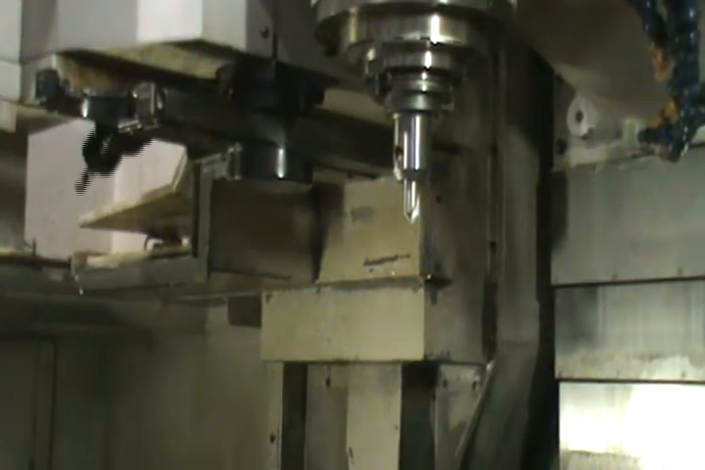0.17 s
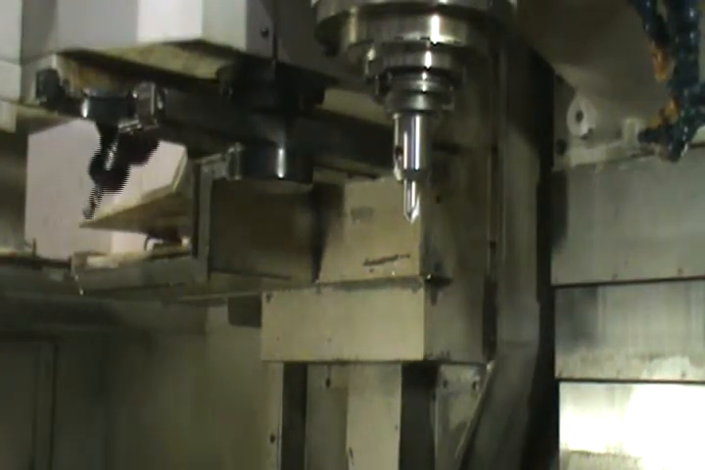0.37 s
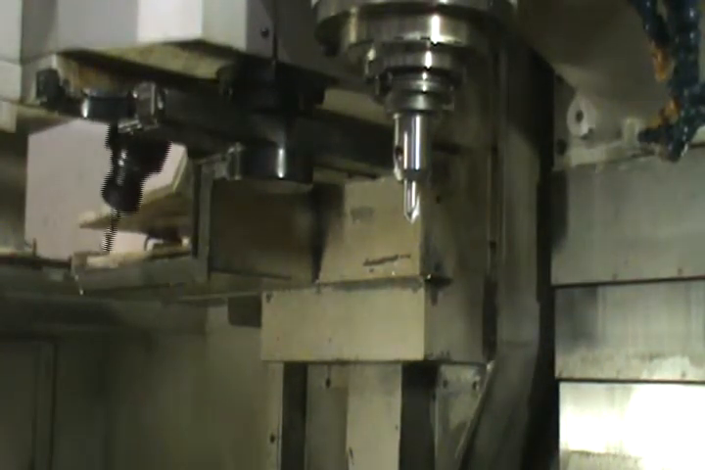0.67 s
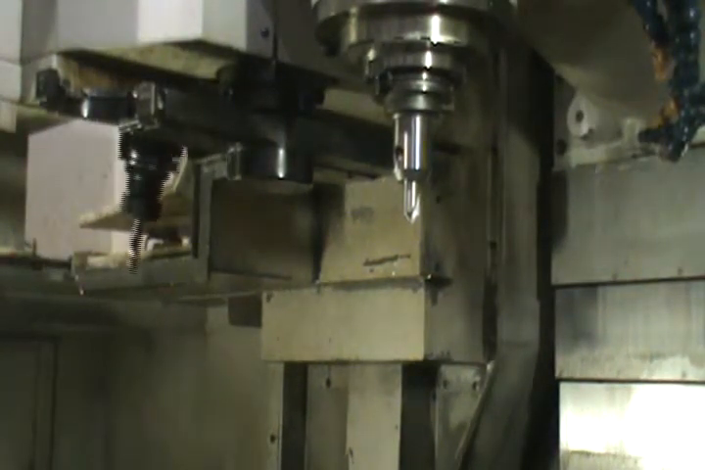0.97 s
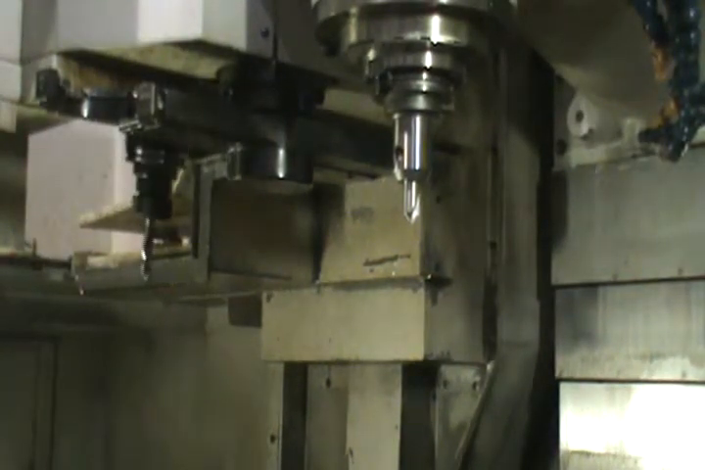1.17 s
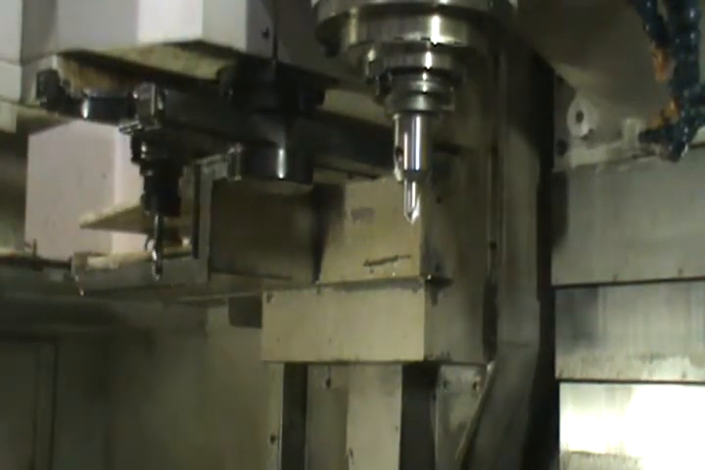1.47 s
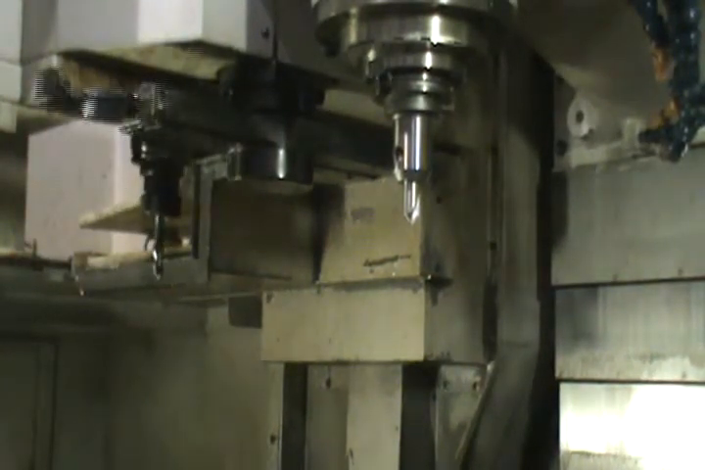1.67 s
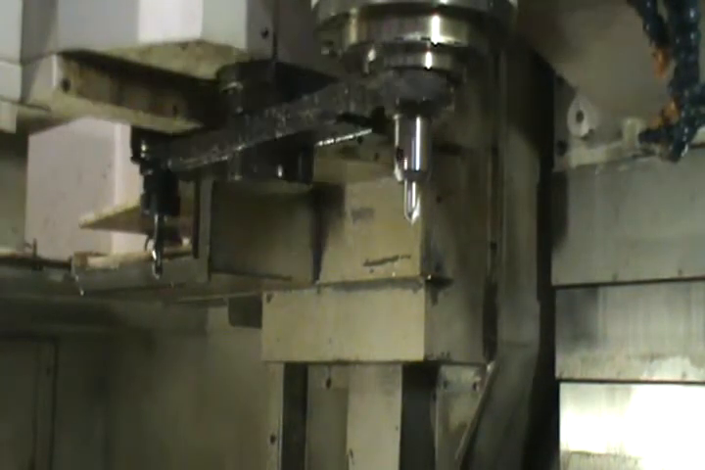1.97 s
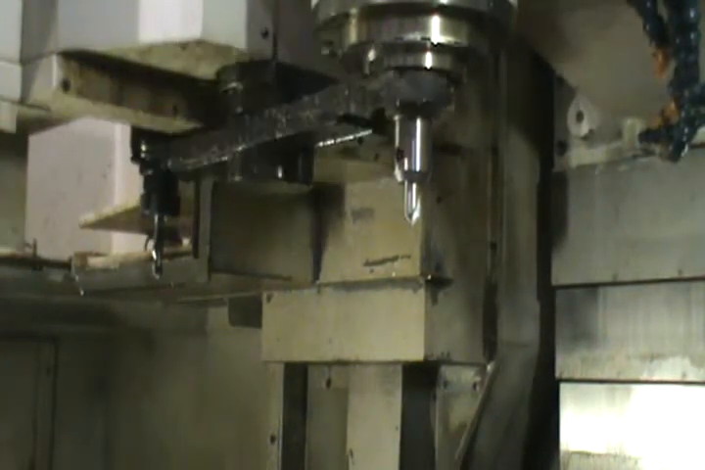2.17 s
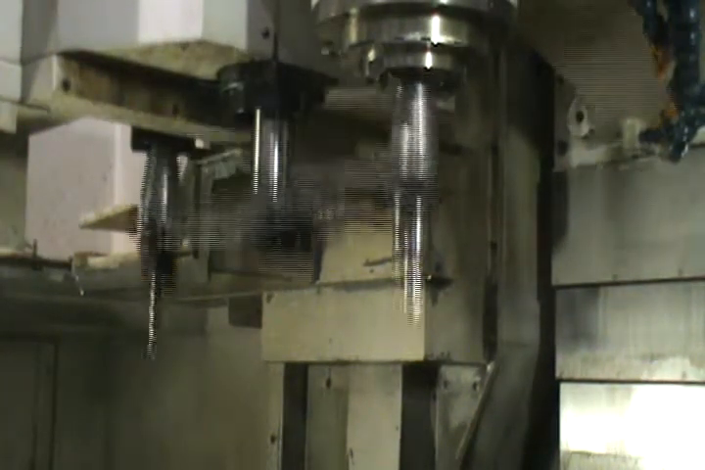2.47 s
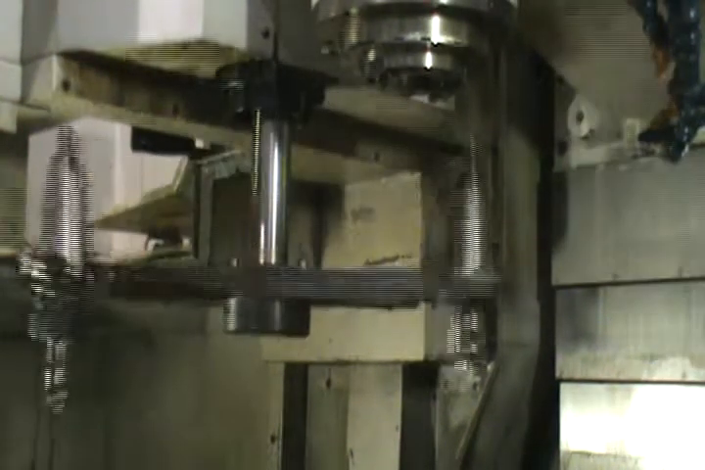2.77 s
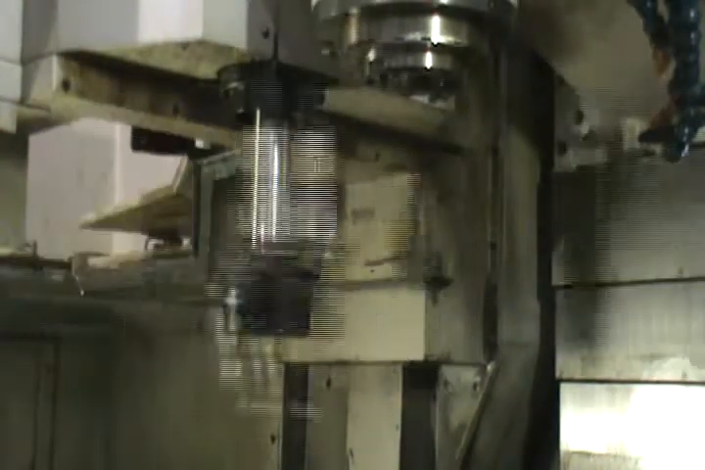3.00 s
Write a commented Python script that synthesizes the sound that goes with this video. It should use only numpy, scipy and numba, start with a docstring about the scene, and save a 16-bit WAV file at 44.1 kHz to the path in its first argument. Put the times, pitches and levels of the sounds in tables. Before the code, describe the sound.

A machine's tool-swapping arm clunks, whirs up, bangs and rattles as compressed air hisses, then whirs on over constant hum and fan noise; small stereo camera microphone nearby in a reverberant workshop.

```python
"""A machining centre changes tools, heard from a small camera beside the open enclosure.
A pump hums (wavering sines) and fans hiss (coloured noise, duct resonances) throughout. First the tool pot
clunks down (ringing castings), then the geared arm whirs round (mesh tone, tooth noise, bearing whir). Air
blasts the taper (noise bursts, whistles) as the drawbar knocks and rattles loose (dense taps, chatter), and
the arm whirs on. The camera turns its gain down under the blast."""
import sys
import numpy as np
from scipy import signal
from scipy.fft import rfft, irfft
from scipy.io import wavfile
from scipy.ndimage import uniform_filter1d
from numba import njit

SR = 44100
rng = np.random.default_rng(int(sys.argv[2]) if len(sys.argv) > 2 else 0)


def digitize_waveform(pressure):
    """Quantize a signal to 16-bit integers and store it at the path in sys.argv[1].

    Rows of a 2-D input are taken as channels; values are limited to [-1, 1].
    """
    field = np.atleast_2d(pressure).T
    bounded = np.clip(field, -1, 1)
    quanta = np.round(bounded * 32767).astype(np.int16)
    wavfile.write(sys.argv[1], SR, quanta)


def amplitude_ratio(level_db):
    """Convert a level in decibels to the matching linear amplitude (field) ratio."""
    exponent = np.asarray(level_db, float) / 20
    return 10 ** exponent


N = 138474
T = np.arange(N) / SR  # seconds

# Path of the arm drive: time_s, mesh_hz, mesh_level_db, noise_level_db (whir and tooth noise)
ARM_DRIVE = [(1.72, 418, -76.5, -36), (1.77, 449.3, -25, -27.5), (1.81, 482.1, -26, -27),
             (1.85, 493.4, -17.5, -27), (1.9, 497.2, -25, -28), (1.96, 491.6, -19, -20),
             (2.0, 493, -19, -20), (2.22, 493, -29, -35.5), (2.28, 493, -58, -26.5), (2.42, 493, -45, -31),
             (2.49, 492, -14, -13), (2.53, 496.7, -14, -16), (2.66, 494, -18.5, -18), (2.8, 493, -20, -23),
             (2.93, 492.6, -20, -18), (3.04, 494.8, -17, -23), (3.09, 493.3, -20, -23.5),
             (3.14, 491, -20.5, -26)]
# Overtones of the gear mesh: multiple, level_db
MESH_HARMONICS = [(1, 1), (2, -13), (3, -15)]
# Moments when the mesh bears harder or slackens: time_s, change_db
MESH_SWELLS = [(1.809, 8.5), (1.852, 6), (1.898, 11), (2.53, 8.5), (2.605, 8.5), (2.658, 12), (2.69, -13),
               (2.71, 3), (2.89, -4), (3.0, -8), (3.05, 5), (3.08, -2), (3.124, 5.5)]
# Gearbox resonances rung by tooth noise, relative levels: centre_hz, width_hz, level_db
GEARBOX_RESONANCES = [(921.4, 46, -0.5), (1429, 72, -7), (1880, 160, -10.5), (2880, 150, -12.5),
                      (4060, 87, -14.5), (4470, 110, -8.5), (4850, 21, -15), (5340, 140, -16),
                      (5870, 27, -14), (6380, 450, -8), (7525, 130, -14)]
# Bearing whir, relative spectrum: frequency_hz, density_db (per Hz)
WHIR_SPECTRUM = [(240, -50), (400, -7.5), (494, -8.5), (697, -13.5), (907, -10), (1300, -23.5),
                 (1520, -14.5), (1730, -21), (4490, -25), (9400, -29.5)]
# Ringing modes of the arm and head castings: pitch_hz, level_db, t60_s
CASTING_MODES = [(62, -6, .4), (150, -4, .24), (194, 0, .2), (325, -5, .1), (511, -2, .14), (590, -6, .08),
                 (660, -5, .1), (765, -6, .09), (895, -7, .13), (1044, -10, .08), (1244, -13, .06),
                 (1630, -11, .08), (1880, -12, .06)]
# Blows on the castings: start_s, peak_db, strongest_hz, spread_octaves
BLOWS = [(1.143, -17, 305, 1), (1.167, -21, 255, 1.6), (1.57, -7, 295, 0.93), (1.586, -12, 510, 0.54),
         (1.597, -6.5, 203, 0.35), (1.612, -18, 296, 0.75), (1.648, -17, 180, 1), (1.677, -13.5, 200, 0.64),
         (2.002, -8, 1650, 0.46), (2.012, -3, 1810, 0.34), (2.034, 5, 570, 1), (2.055, -1, 495, 0.3),
         (2.073, 0.5, 243, 1.1), (2.096, -5, 190, 0.69), (2.111, -5, 680, 0.46), (2.165, -4.5, 196, 0.75),
         (2.217, -5.5, 121, 1.2), (2.307, -28, 63, 0.49), (2.377, -11.5, 870, 0.13),
         (2.39, -16.5, 925, 0.057)]
# Drawbar rattle as it slides: time_s, level_db (of the whole blend, relative), resonance_hz
DRAWBAR_RATTLE = [(1.985, -40, 1700), (2.008, -15, 1650), (2.03, -14, 900), (2.05, -16, 560),
                  (2.09, -17, 620), (2.115, -12, 760), (2.16, -13, 690), (2.215, -13, 640),
                  (2.245, -23, 600), (2.33, -29, 860), (2.4, -26, 900), (2.43, -50, 900)]
# Compressed-air bursts: start_s, rise_s, t60_s (after the rise), level_db, centre_hz, spread_octaves
AIR_BURSTS = [(1.978, 0.00084, 0.28, -10.5, 4370, 1.65), (2.022, .003, .05, -16.5, 4440, 0.74),
              (2.149, 0.045, .4, -19, 6000, 0.63), (2.403, 0.04, 0.85, -6.5, 6000, 4.2),
              (2.884, .003, .09, -12.5, 8300, 0.82)]
# Air jet, relative spectrum ahead of each burst's own band: frequency_hz, density_db (per Hz)
JET_SPECTRUM = [(530, 6.5), (900, -3.5), (1130, 6), (1360, 3), (1640, 4.5), (3490, -7.5), (4370, -6),
                (4590, -4.5), (4970, -2), (9400, -12)]
# Nozzle whistles: start_s, fade_s, pitch_hz, level_db (before flutter)
NOZZLE_WHISTLES = [(2.123, .015, 4150, -20), (2.165, .09, 4110, -25), (2.438, .11, 4680, -12)]
# Fan and shop noise, relative spectrum: frequency_hz, density_db (per Hz)
SHOP_SPECTRUM = [(15, -53), (25, -6.5), (216, -5.5), (264, -5.5), (314, -6.5), (423, -12.5), (467, -16),
                 (529, -14), (1170, -19.5), (2340, -21), (3230, -26.5), (6170, -24), (9400, -32)]
# Resonances of the enclosure: centre_hz, width_hz, level_db
DUCT_RESONANCES = [(247.6, 26, -38), (313.6, 13, -38.5), (2452, 160, -43), (3890, 160, -49.5),
                   (6270, 170, -46), (7190, 120, -47)]
# Pump pulsation: multiple (of the pump rate), level_db
PUMP_HARMONICS = [(2, -34.5), (3, -29.5), (4, -41), (6, -43), (8, -44), (9, -47.5), (10, -46.5), (12, -51)]
# Other steady tones of motors and fans: pitch_hz, level_db
MOTOR_TONES = [(60, -42), (120, -40), (148, -43), (416, -33)]
# Likeness of the two microphone ports: frequency_hz, likeness (0 to 1)
PORT_LIKENESS = [(60, 1), (130, 1), (280, 0.71), (600, 0.85), (1280, 0.81), (2760, 0.95), (5930, 1),
                 (12800, 1)]
# Phase by which the left port leads the right: frequency_hz, lead_rad
LEFT_LEAD = [(0, -0.5), (260, 0.92), (520, 0.5), (950, 1), (1460, 0.65), (3190, 0.09), (10300, 0.0),
             (11300, 2)]
# Level of the left port over the right: frequency_hz, difference_db
LEFT_OVER_RIGHT = [(60, 0.5), (110, 1), (200, -2.5), (360, -3), (650, -3.5), (1180, -1), (2140, -1.0),
                   (3880, -0.5), (7030, -0.5), (12800, -2)]


def level(x, db):
    """Scale a sound to an rms level."""
    return x * amplitude_ratio(db) / np.sqrt(np.mean(x ** 2))


def on_hz(table, hz):
    """Read a spectrum table along a log-frequency axis."""
    points = np.array(table, float)
    return np.interp(np.log(hz + 1), np.log(points[:, 0] + 1), points[:, 1])


def curve(table, axis):
    """Draw one column of a time table as a sample-by-sample line."""
    points = np.array(table, float)
    return np.interp(T, points[:, 0], points[:, axis])


def coloured(table):
    """Shape white noise to a spectrum, held flat above 9300 Hz; rms 1."""
    hz = np.minimum(np.fft.rfftfreq(N, 1 / SR), 9300)
    white = rfft(rng.standard_normal(N))
    return level(irfft(white * amplitude_ratio(on_hz(table, hz)), N), 0)


def walk(rate):
    """Smooth random drift of rms 1: noise averaged twice over 1 / rate seconds."""
    k = int(SR / rate)
    once = uniform_filter1d(rng.standard_normal(N), k)
    return level(uniform_filter1d(once, k), 0)


@njit
def svf(x, hz, width):
    """State-variable band-pass whose centre may move, gain 1 at the centre."""
    y, band, low = np.empty(len(x)), 0., 0.
    for i in range(len(x)):
        g, k = np.tan(np.pi * hz[i] / SR), width / hz[i]
        v = (band + g * (x[i] - low)) / (1 + g * (g + k))
        band, low, y[i] = 2 * v - band, low + 2 * g * v, k * v
    return y


@njit
def follow(x, up, down):
    """Envelope follower with separate rise and fall."""
    y, e = np.empty(len(x)), 0.
    for i in range(len(x)):
        e += (x[i] - e) * (up if x[i] > e else down)
        y[i] = e
    return y


def ringing(table, waver_db):
    """Noise ringing in fixed resonances, each swelling on its own."""
    out = 0
    for hz, width, db in table:
        band = svf(rng.standard_normal(N), np.full(N, 1. * hz), 1. * width)
        out = out + amplitude_ratio(waver_db * walk(23.5)) * level(band, db)
    return out


def arm():
    """Gear teeth meet at a gliding pitch that swells under load, over gearbox ringing and bearing whir."""
    swell_s = 0.011
    mesh_hz = curve(ARM_DRIVE, axis=1) * (1 + .0012 * walk(26))
    phase = 2 * np.pi * np.cumsum(mesh_hz) / SR
    swell_db = sum(db * np.exp(-((T - at) / swell_s) ** 2) for at, db in MESH_SWELLS)
    mesh = 0
    for k, db in MESH_HARMONICS:
        mesh = mesh + amplitude_ratio(db + 1.3 * walk(30)) * np.sin(k * phase)
    mesh = mesh * amplitude_ratio(swell_db)
    teeth = level(ringing(GEARBOX_RESONANCES, 2.5), 0)
    whir = amplitude_ratio(1.5 + 2.05 * walk(40)) * coloured(WHIR_SPECTRUM)
    blend = amplitude_ratio(curve(ARM_DRIVE, axis=2)) * mesh + amplitude_ratio(curve(ARM_DRIVE, axis=3)) * (teeth + whir)
    return (T > ARM_DRIVE[0][0]) * blend


def knocks():
    """Each blow rings the casting modes, most strongly near its own pitch, under a short noisy crack."""
    crack_db, crack_s, push_s = -14, 0.019, .001  # crack decay and softened onset, as time constants
    out, t = np.zeros(N + SR), T[:SR // 2]
    hz, db, t60 = np.array(CASTING_MODES).T[:, :, None]
    chance = rng.standard_normal((len(BLOWS), len(CASTING_MODES), 2))
    for (at, peak_db, mid_hz, spread), c in zip(BLOWS, chance):
        # every blow meets the modes with slightly different strengths and pitches
        gain = amplitude_ratio(db + 1.3 * c[:, :1]) * np.exp(-(np.log2(hz / mid_hz) / spread) ** 2)
        modes = np.sin(2 * np.pi * hz * (1 + 0.011 * c[:, 1:]) * t) * np.exp(-np.log(1000) * t / t60)
        ring = np.sum(gain * modes, axis=0)
        crack = svf(rng.standard_normal(len(t)), np.full(len(t), 1.746 * mid_hz), 0.5 * mid_hz * spread)
        blow = ring / np.abs(ring).max() + level(crack, crack_db) * np.exp(-t / crack_s)
        blow *= 1 - np.exp(-t / push_s)
        i = int(at * SR)
        out[i:i + len(t)] += blow * amplitude_ratio(peak_db) / np.abs(blow).max()
    return out[:N]


def rattle():
    """Dense uneven taps and a rough chatter in a sliding resonance while the tool comes free."""
    taps_per_s = 9000
    taps = (rng.random(N) < taps_per_s / SR) * rng.standard_normal(N)
    hz = curve(DRAWBAR_RATTLE, axis=2)
    core = level(svf(svf(taps, hz, 320.), hz, 450.), 0)
    skirt = level(svf(taps, hz, 900.), -5)
    bright = level(svf(taps, 2.4 * hz, 400.), -14)
    rough_phase = 2 * np.pi * np.cumsum(hz * (1 + .04 * walk(70))) / SR
    chatter = level(np.sin(rough_phase) * amplitude_ratio(3. * walk(60)), -6)
    during = (T > DRAWBAR_RATTLE[0][0]) * (T < DRAWBAR_RATTLE[-1][0])
    return (core + skirt + bright + chatter) * amplitude_ratio(curve(DRAWBAR_RATTLE, axis=1)) * during


def air():
    """Compressed air escapes as decaying bands of turbulent noise; the nozzles add fluttering whistles."""
    flutter_hz, flutter_depth = 40, 1
    out, hz = 0, np.fft.rfftfreq(N, 1 / SR) + 1
    jet = rfft(coloured(JET_SPECTRUM) * amplitude_ratio(0.51 * walk(90)))
    for at, rise, t60, db, mid_hz, spread in AIR_BURSTS:
        env = np.clip((T - at) / rise, 0, 1) * amplitude_ratio(-60 * np.maximum(T - at - rise, 0) / t60)
        band = np.exp(-(np.log2(hz / mid_hz) / spread) ** 2)
        out = out + env * level(irfft(jet * band, N), db)
    for at, fade, tone_hz, db in NOZZLE_WHISTLES:
        shape = np.clip((T - at) / 0.0021, 0, 1) * np.exp(-np.maximum(T - at, 0) ** 2 / fade ** 2)
        flutter = 1 + flutter_depth * np.sin(2 * np.pi * flutter_hz * (T - at) + .5 * walk(22))
        phase = 2 * np.pi * np.cumsum(tone_hz * (1 + .0035 * walk(150))) / SR
        out = out + amplitude_ratio(db + 2.6 * walk(60)) * shape * flutter * np.sin(phase)
    return out


def fans():
    """Broad, slightly drifting air noise with duct resonances ringing in it."""
    hiss = amplitude_ratio(-28.5 + .5 * walk(13)) * coloured(SHOP_SPECTRUM)
    return hiss + ringing(DUCT_RESONANCES, 1.15)


def hum():
    """Pump pulsation harmonics and motor tones: sines that waver a little in level and phase."""
    pump_hz = 89
    lines = [(k * pump_hz, db) for k, db in PUMP_HARMONICS] + MOTOR_TONES
    out = 0
    for hz, db in lines:
        waver_db, waver_cycles = 1.2 * walk(6), .02 * walk(6)
        cycles = hz * T + rng.random() + waver_cycles
        out = out + np.sqrt(2) * amplitude_ratio(db + waver_db) * np.sin(2 * np.pi * cycles)
    return out


def echo(x):
    """The enclosure and shop reflect sound as a decaying noise tail of unit energy."""
    t60_s = .3
    tail = rng.standard_normal(SR // 2) * amplitude_ratio(-60 * T[:SR // 2] / t60_s)
    return signal.fftconvolve(x, tail / np.sqrt(np.sum(tail ** 2)))[:N]


def ports(direct, diffuse):
    """Two microphone ports differ in phase and level; the diffuse part is opposed between them."""
    hz = np.fft.rfftfreq(N, 1 / SR)
    like = np.clip(on_hz(PORT_LIKENESS, hz), 0, 1)
    shared = rfft(direct) * np.sqrt((1 + like) / 2)
    opposed = rfft(diffuse) * np.sqrt((1 - like) / 2)
    # half of each difference goes to either port
    turn = amplitude_ratio(on_hz(LEFT_OVER_RIGHT, hz) / 2) * np.exp(.5j * on_hz(LEFT_LEAD, hz))
    left = irfft((shared + opposed) * turn, N)
    right = irfft((shared - opposed) / turn, N)
    return np.array([left, right])


def scene():
    """Changer sounds with their echo over the steady machine."""
    changer = arm() + knocks() + rattle() + air()
    direct = changer + amplitude_ratio(-9) * echo(changer) + fans() + hum()
    return ports(direct, echo(changer) + fans())


def passband(x, lo_hz, hi_hz):
    """Keep only the frequencies between two edges."""
    hz = np.fft.rfftfreq(N, 1 / SR)
    return irfft(rfft(x) * ((hz >= lo_hz) & (hz <= hi_hz)), N)


def low_pass(x):
    """Removes everything above the highest recorded frequency."""
    return signal.sosfilt(signal.butter(12, 13350, fs=SR, output="sos"), x)


def record(dry):
    """Treble-led gain control, rounded peaks and a cut top; one upper band passes only while it is loud."""
    threshold_db, ratio, attack_s, release_s = -25, 2.4, .005, .078
    listen_hz, top_hz = 3000, 10200
    treble = np.abs(passband(dry.mean(axis=0), listen_hz, top_hz))
    env = follow(treble, 1 / (attack_s * SR), 1 / (release_s * SR))
    gain = np.minimum(1, amplitude_ratio(threshold_db) / (env + 1e-9)) ** (1 - 1 / ratio)
    main = passband(np.tanh(dry * gain), 0, top_hz)
    upper = passband(dry, 11350, 12050)
    loudness = uniform_filter1d(np.abs(upper[0]), int(.06 * SR))  # averaged over 60 ms
    is_open = loudness > loudness.max() * amplitude_ratio(-6)  # within 6 dB of its loudest moment
    gate = uniform_filter1d(1. * is_open, size=600)
    return low_pass(main + amplitude_ratio(9) * upper * gain * gate)


dry = scene()
out = record(dry)
digitize_waveform(out)
```